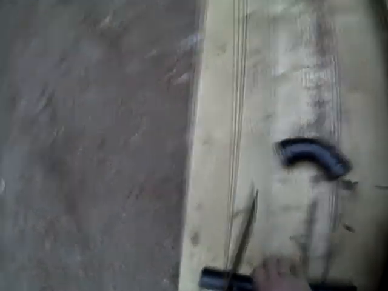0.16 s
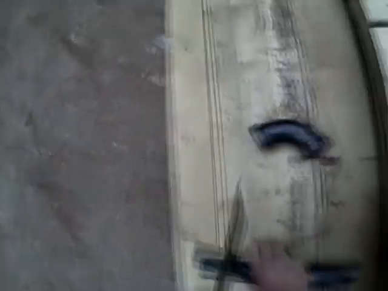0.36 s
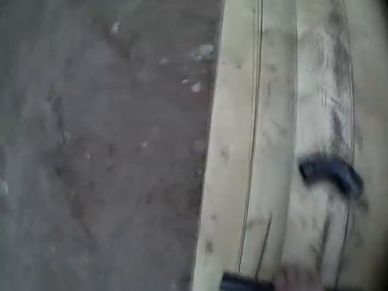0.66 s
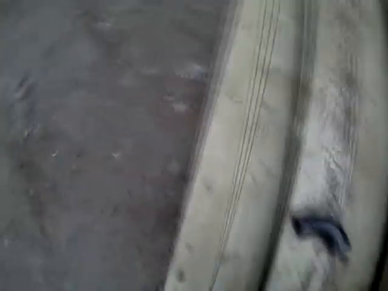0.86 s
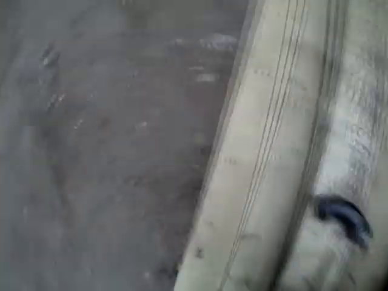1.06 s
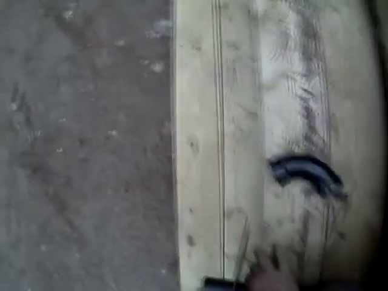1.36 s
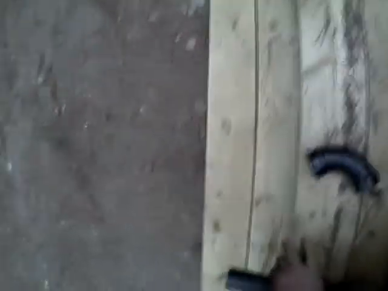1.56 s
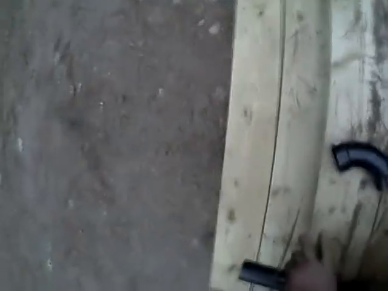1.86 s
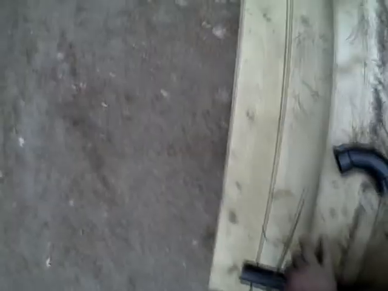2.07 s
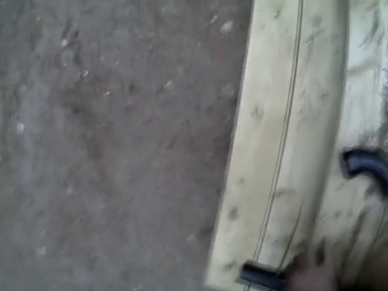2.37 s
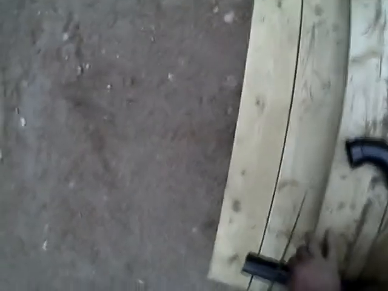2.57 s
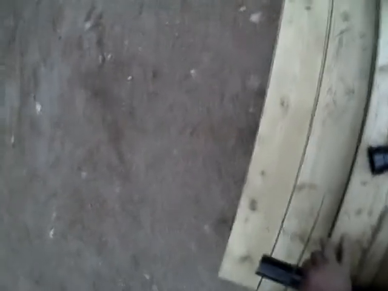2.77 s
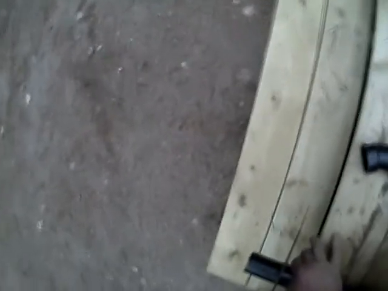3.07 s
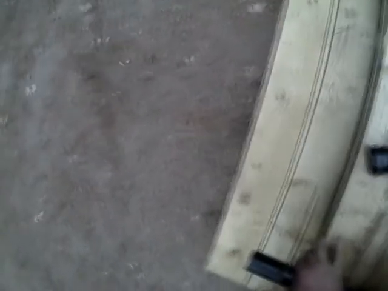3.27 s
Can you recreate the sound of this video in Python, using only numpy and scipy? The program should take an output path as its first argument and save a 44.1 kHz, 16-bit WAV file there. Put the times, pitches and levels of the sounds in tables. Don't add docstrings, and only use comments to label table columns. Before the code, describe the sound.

Sawing through plastic pipe: a few tentative strokes, a quiet shift, then fast rasping back-and-forth cuts

```python
import sys
import numpy as np
from scipy import signal
from scipy.fft import rfft, irfft, next_fast_len
from scipy.io import wavfile
from scipy.ndimage import uniform_filter1d

SR = 44100
rng = np.random.default_rng(int(sys.argv[2]) if len(sys.argv) > 2 else 0)


def level_to_linear(level):
    exponent = np.asarray(level, float) / 20
    return 10 ** exponent


def wav_out(sig):
    wavfile.write(sys.argv[1], SR, np.round(np.clip(np.atleast_2d(sig).T, -1, 1) * 32767).astype(np.int16))


N = 149940

# start [t/s], length [t/s], hiss [level/dB], hum of pipe and plank [level/dB]
BACK_STROKES = [(0.067, 0.028, -39.5, -40), (0.213, 0.048, -25.5, -33), (0.372, 0.043, -38, -40.5),
                (1.361, 0.035, -32.5, -35), (1.515, 0.043, -28.5, -36.5), (1.653, 0.045, -23.5, -38.5),
                (1.795, 0.043, -24, -36.5), (1.929, 0.043, -22, -33.5), (2.07, 0.043, -23.5, -37),
                (2.207, 0.041, -21.5, -32), (2.346, 0.041, -20, -33.5), (2.485, 0.044, -22, -31.5),
                (2.624, 0.043, -25, -33), (2.765, 0.049, -24.5, -30.5), (2.901, 0.049, -25, -29.5),
                (3.043, 0.048, -24.5, -28), (3.18, 0.039, -25, -28), (3.32, 0.041, -23.5, -26.5)]
# start [t/s], length [t/s], judder [level/dB]
TEETH_CATCHING = [(0.095, 0.086, -28), (0.286, 0.038, -22), (0.444, 0.034, -23), (1.428, 0.042, -21.5),
                  (1.581, 0.025, -20.5), (1.717, 0.058, -25.5), (1.861, 0.048, -29.5), (1.997, 0.049, -22),
                  (2.144, 0.043, -16.5), (2.282, 0.039, -14.5), (2.413, 0.04, -17.5), (2.564, 0.028, -10.5),
                  (2.7, 0.033, -12), (2.846, 0.032, -11.5), (2.984, 0.021, -11.5), (3.112, 0.038, -12.5),
                  (3.247, 0.052, -18.5), (3.381, 0.01, -21.5)]
# pitch [f/Hz], width [f/Hz], strength [level/dB]
PLANK_MODES = [(264, 55, 2), (334, 39, 3), (392, 22, -0.5), (460, 15.4, 4), (511, 20.5, -1),
               (616, 63, -5.5)]


def evened(x):
    return x / np.sqrt(np.mean(x ** 2) + 1e-20)


def noise():
    return rng.standard_normal(N)


def drift(size):
    return evened(uniform_filter1d(noise(), size=size))


def colour(x, table):
    size = next_fast_len(x.shape[-1] + 8192)
    hz, db = np.transpose(table)
    pitches = np.fft.rfftfreq(size, 1 / SR)
    gain = level_to_linear(np.interp(np.log(pitches + 1), np.log(hz + 1), db))
    return irfft(rfft(x, size) * gain, size)[..., :x.shape[-1]]


def ring(x, modes):
    out = np.zeros_like(x)
    for k, (hz, width, db) in enumerate(modes):
        r = np.exp(-np.pi * width / SR)
        feedback = [1, -2 * r * np.cos(2 * np.pi * hz / SR), r * r]
        out += (-1) ** k * level_to_linear(db) * (1 - r) * signal.lfilter([1, 0, -1], feedback, x)
    return out


def arches(rows, skew=0.72, sharp=1.):
    overhang, skirt_db = 0.36, -37
    out = np.zeros(N)
    for start, length, db in rows:
        first = (start - overhang * length) * SR
        span = length * (1 + 2 * overhang) * SR
        at = np.arange(max(int(first) + 1, 0), min(int(first + span), N))
        arch = np.sin(np.pi * ((at - first) / span) ** skew).clip(0)
        out[at] += level_to_linear(db) * (arch ** sharp + level_to_linear(skirt_db) * arch ** .3)
    return out


def grit(size=60):
    chip_db, clump_db = 1.2, 1
    chips = drift(size).clip(-2, 2)
    clumps = drift(6 * size).clip(-2, 2)
    return noise() * level_to_linear(chip_db * chips + clump_db * clumps)


def patchy(x, depth_db):
    z = signal.stft(x, nperseg=512)[2]
    field = rng.standard_normal(z.shape[::-1])
    field = uniform_filter1d(field, size=9, axis=0)
    field = uniform_filter1d(field, size=4, axis=1).T
    return signal.istft(z * level_to_linear(depth_db * evened(field)), nperseg=512)[1][:N]


def hiss(drive, tone, ring_db):
    # pitch [f/Hz], width [f/Hz], strength [level/dB]
    rings = [(1446, 82, 4), (1687, 26, 10.5), (2570, 140, -7.5), (4000, 60, 4), (7250, 58, 5),
             (7500, 34, 13), (7907, 70, 9.5), (8070, 72, 4), (8200, 80, 7)]
    # time [t/s], pipe wall [level/dB], blade [level/dB]
    depth = [
        (1.4, -2, -1.5),
        (2.1, 1.5, 6.5),
        (2.7, 4, -1.5),
        (3.4, 6.5, -3.5),
    ]
    # pitch [f/Hz], level [level/dB]
    fresh_tone = [(600, -2), (850, -8.5), (1400, 2), (3150, 2.5), (3400, -6), (3800, -9), (4050, 4.5)]
    fresh_s, fresh_shift = .6, 1.12
    t = np.arange(N) / SR
    fresh = np.arange(N) < fresh_s * SR
    plain = colour(drive, tone)
    wall_modes = rings[:4]
    fresh_modes = [(hz * fresh_shift, width, db) for hz, width, db in wall_modes]
    wall = np.where(fresh, ring(plain, fresh_modes), ring(plain, wall_modes))
    blade = ring(plain, rings[4:])
    s, wall_db, blade_db = np.transpose(depth)
    ringing = level_to_linear(np.interp(t, s, wall_db)) * wall + level_to_linear(np.interp(t, s, blade_db)) * blade
    mixed = patchy(plain + level_to_linear(ring_db) * ringing, depth_db=1.9)
    mixed = np.where(fresh, colour(mixed, fresh_tone), mixed)
    return mixed / np.std(colour(mixed, [(1400, -60), (1500, 0), (8500, 0), (8600, -60)]))


def room_air():
    # pitch [f/Hz], level [level/dB]
    air_tone = [(40, 0), (80, 12), (180, 4), (550, 2), (900, -8.5), (7000, -14.5)]
    return level_to_linear(-52.5) * evened(colour(noise(), air_tone))


def sway():
    # time [t/s], level [level/dB]
    wobble_course = [
        (0, -36),
        (0.302, -28),
        (.58, -36.5),
        (.68, -29.5),
        (1.25, -44.5),
        (1.6, -33.5),
        (3.4, -27),
    ]
    # pitch [f/Hz], level [level/dB]
    wobble_tone = [(3, -26), (11, 19.5), (38, -1), (70, -45)]
    # time [t/s], level [level/dB]
    thuds = [
        (0.061, -49),
        (1.39, -31.5),
        (1.729, -21),
        (2.021, -27),
        (2.432, -15.5),
        (2.56, -35),
        (2.699, -18),
        (2.773, -18),
        (2.984, -21),
        (3.128, -13),
    ]
    thud_hz, thud_s, shake_db = 48.1, 0.014, -12
    t = np.arange(N) / SR
    jolts = np.zeros(N)
    for at, db in thuds:
        u = (t - at).clip(0) / thud_s
        hz = thud_hz * rng.uniform(0.77, 1.24)
        jolts += level_to_linear(db + 5.0) * u * np.exp(-u) * np.sin(2 * np.pi * hz * (t - at))
    rumble = evened(colour(noise(), [(35, 1), (55, 1.5), (130, -4), (260, -28.0)]))
    back = np.array(BACK_STROKES)[:, [0, 1, 3]]
    effort = arches(TEETH_CATCHING, sharp=0.71) + arches(back, sharp=0.092) * level_to_linear(10.5)
    s, wobble_db = np.transpose(wobble_course)
    wobble = level_to_linear(np.interp(t, s, wobble_db)) * evened(colour(noise(), wobble_tone))
    return wobble + level_to_linear(shake_db) * effort * rumble + jolts


def back_strokes():
    # pitch [f/Hz], level [level/dB]
    skim_tone = [(410, -66), (700, -9.5), (1160, -6.5), (1420, -1), (2050, -3.5), (3070, 0.5), (5140, -6),
                 (7760, -1.5), (8710, 0.5)]
    back = np.array(BACK_STROKES)
    skim = arches(back[:, :3], skew=0.87, sharp=1.55) * hiss(grit(), skim_tone, ring_db=0.5)
    hum = arches(back[:, [0, 1, 3]], skew=0.58, sharp=0.42) * evened(ring(grit(), PLANK_MODES))
    return skim + hum


def tooth_phase():
    early_hz, late_hz, jitter = 521.6, 301.8, 0.16
    start, length, _ = np.transpose(TEETH_CATCHING)
    corners = np.ravel([start, start + length], "F")
    hz = np.interp(np.arange(N) / SR, corners, np.tile((early_hz, late_hz), len(start)))
    return np.cumsum(hz * (1 + jitter * drift(200))) / SR


def cutting_strokes(turns):
    # start [t/s], length [t/s], hiss [level/dB]
    strokes = [(0.109, 0.076, -38), (0.277, 0.046, -31), (0.441, 0.038, -32.5), (1.416, 0.064, -29.5),
               (1.57, 0.053, -28), (1.708, 0.059, -27.5), (1.844, 0.054, -26.5), (1.995, 0.044, -25),
               (2.127, 0.055, -24.5), (2.269, 0.051, -21), (2.411, 0.046, -18), (2.552, 0.035, -17),
               (2.688, 0.046, -17), (2.832, 0.044, -13.5), (2.97, 0.044, -12.5), (3.11, 0.041, -13.5),
               (3.243, 0.049, -14), (3.382, 0.073, -12)]
    # pitch [f/Hz], level [level/dB]
    chip_tone = [(410, -3), (700, -4), (829, -9), (1450, -1.5), (2260, -4.5), (4030, -6), (5250, -8.5),
                 (7670, -2), (8710, -5.5)]
    rub_db, rub_s = -14, 0.11
    cut = arches(strokes, skew=0.97, sharp=2.74)
    bite = 1 + 0.25 * np.cos(2 * np.pi * turns)
    chips = cut * hiss(bite * grit(), chip_tone, ring_db=-5.5)
    rub = evened(colour(grit(size=150), [(500, -23), (750, 15.0), (3500, 1.5), (8000, -26)]))
    fade = np.exp(-np.arange(8000) / (rub_s * SR)) / (rub_s * SR)
    return chips + level_to_linear(rub_db) * signal.oaconvolve(cut, fade)[:N] * rub


def judder(turns):
    teeth = .4 * np.cos(2 * np.pi * turns) + 2.4 * grit(size=150)
    push = arches(TEETH_CATCHING, skew=0.67, sharp=1.51)
    return level_to_linear(-5) * ring(teeth * push, PLANK_MODES) / np.std(ring(teeth, PLANK_MODES))


def snags():
    # time [t/s], length [t/s], level [level/dB], pitch [f/Hz]
    snag_rows = [(0.092, 0.036, -31.5, 269), (0.142, 0.051, -28, 255.4), (0.16, 0.044, -30.5, 249.5),
                 (0.24, 0.028, -39, 334), (0.299, 0.027, -20, 264), (0.464, 0.029, -17.5, 258.4),
                 (0.647, 0.017, -38.6, 347), (0.783, 0.037, -36.5, 392), (1.03, 0.012, -42, 596),
                 (1.353, 0.033, -43, 532), (1.367, 0.013, -58, 308), (1.442, 0.019, -25.5, 285),
                 (1.463, 0.03, -26, 320), (1.59, 0.012, -20.5, 373), (1.607, 0.023, -20.5, 348),
                 (1.728, 0.017, -33.5, 280), (1.747, 0.013, -30.5, 425), (1.765, 0.0093, -33, 333),
                 (1.872, 0.013, -27, 446), (1.877, 0.017, -31, 270), (1.905, 0.011, -27, 322),
                 (1.934, 0.02, -34.7, 516), (1.938, 0.017, -35, 322), (2.015, 0.017, -27, 420),
                 (2.026, 0.021, -24, 318), (2.164, 0.021, -17, 377), (2.3, 0.018, -14, 462),
                 (2.315, 0.024, -20.5, 303), (2.429, 0.036, -17.5, 392), (2.441, 0.034, -17, 316.5),
                 (2.58, 0.014, -12, 426), (2.72, 0.013, -7.5, 475), (2.725, 0.024, -9, 280.7),
                 (2.858, 0.024, -20, 480), (2.874, 0.018, -12, 293), (3.012, 0.016, -10, 293),
                 (3.13, 0.018, -11, 605), (3.152, 0.022, -12, 283), (3.247, 0.053, -31, 283),
                 (3.254, 0.032, -27.5, 432), (3.275, 0.029, -22, 296), (3.282, 0.021, -24.5, 498),
                 (3.285, 0.015, -20.5, 615), (3.291, 0.012, -20, 232), (3.316, 0.017, -31, 272),
                 (3.391, 0.015, -26, 390), (3.392, 0.018, -26.5, 246), (3.395, 0.012, -20.5, 560),
                 (1.443, .016, -25.5, 577),
        (1.54, 0.028, -31, 322),
        (1.544, 0.017, -30, 546),
        (2.15, 0.014, -23.5, 460),
        (2.446, 0.014, -18.5, 470.3),
        (.127, 0.019, -38, 1140),
        (2.7, 0.01, -21, 560),
    ]
    rise, fall = .28, .38
    edge_db, rough_db = -18.5, 2.5
    out = np.zeros(N)
    for (at, length, db, hz), turn in zip(snag_rows, rng.random(60)):
        k = np.arange(max(int((at - length) * SR), 0), min(int((at + 4 * length) * SR), N))
        u = (k / SR - at) / length + rise / 2
        shape = np.where(u < 0, np.exp(-.5 * (u / rise) ** 2), 1 / np.cosh(u / fall))
        phase = 2 * np.pi * (hz * length * u + turn)
        crests = np.cos(phase) + level_to_linear(edge_db) * shape * np.cos(2 * phase)
        out[k] += level_to_linear(db + 1) * shape * crests
    return out * level_to_linear(rough_db * drift(250))


def shifting():
    # start [t/s], length [t/s], hiss [level/dB], knock [level/dB]
    scuffs = [
        (0.639, 0.021, -59, -40),
        (0.72, 0.068, -47.5, -51),
        (0.776, 0.033, -68, -41.5),
        (0.857, 0.12, -50.5, -53),
        (0.886, 0.027, -77, -44.5),
        (1.026, 0.08, -53, -66),
        (1.177, 0.078, -54, -81),
    ]
    # pitch [f/Hz], level [level/dB]
    scuff_tone = [(500, 0.5), (800, -7), (4500, -11), (7900, -7.5), (8700, -8.5)]
    s = np.array(scuffs)
    scuff = arches(s[:, :3], sharp=.6) * hiss(grit(), scuff_tone, ring_db=-14)
    wood = [(418, 33, 10.5), (330, 545, 1.0), (670, 140, 4.5), (1220, 200, -7.5)]  # (Hz, width Hz, dB)
    knock = arches(s[:, [0, 1, 3]], sharp=0.82) * evened(ring(grit(size=200), wood))
    slide = grit(size=400)
    for _ in range(3):
        slide = ring(slide, [(560, 250, 0)])
    drag = arches([(0.98, 0.16, -45)], sharp=0.71) * evened(slide)
    return scuff + knock + drag


def scene():
    # pitch [f/Hz], level [level/dB]
    width_tone = [(200, -56), (1700, -48.5), (2000, -19), (2800, -21.5), (3100, -48), (3800, -24),
                  (4700, -47), (6700, -38), (7000, -14.5), (8300, -24.5), (11500, -25.5)]
    turns = tooth_phase()
    saw = back_strokes() + cutting_strokes(turns) + judder(turns) + snags()
    near = room_air() + saw + shifting()
    scatter = rng.standard_normal(900) * np.exp(-np.arange(900) / 220.)
    scattered = signal.oaconvolve(near, scatter / np.linalg.norm(scatter))[:N]
    side = patchy(colour(scattered, width_tone), depth_db=8.0)
    mid = near + sway()
    return np.array([mid + side, mid - side])


def top_cut(x):
    return signal.sosfilt(signal.butter(12, 15890, fs=SR, output="sos"), x)


def record(dry):
    # pitch [f/Hz], level [level/dB]
    top_tone = [(8480, 0.5), (8640, -8.5), (9000, -12.5), (9150, -30.5), (9400, -49), (10400, -39),
                (10700, -28.5), (12200, -18), (13000, -65), (14900, -65), (15300, -33)]
    # pitch [f/Hz], level [level/dB]
    fizz_tone = [(8900, -60), (9200, 2.5), (12500, -8), (15800, -16.5)]
    clip = 1.12
    fizz_db, knee_db, steep = -47.5, -21.5, 7
    mid, side = colour(np.array([dry[0] + dry[1], dry[0] - dry[1]]) / 2, top_tone)
    bite = colour(mid, [(1000, -40), (1500, 0), (6000, 0), (7000, -30)])
    power = uniform_filter1d(uniform_filter1d(bite ** 2, size=1100), size=300)
    over_db = 10 * np.log10(abs(power) + 1e-12) - knee_db
    fizz_level = level_to_linear(fizz_db + np.where(over_db < 0, steep, 1) * over_db)
    fizz = fizz_level * evened(colour(noise(), fizz_tone))
    squashed = clip * np.tanh(mid / clip) - mid
    mid = colour(squashed, top_tone) + mid + fizz
    mix = np.array([mid + side, mid - side]) + [[.015], [.001]]
    return top_cut(mix)


dry = scene()
out = record(dry)
wav_out(out)
```